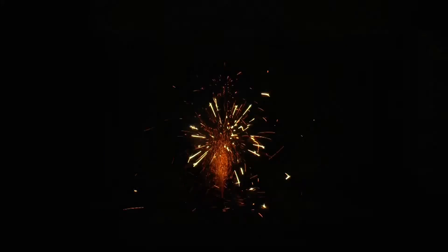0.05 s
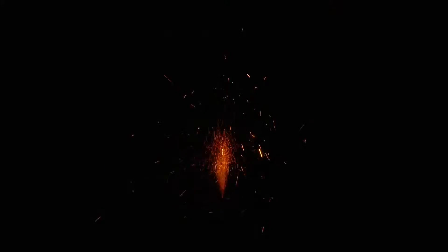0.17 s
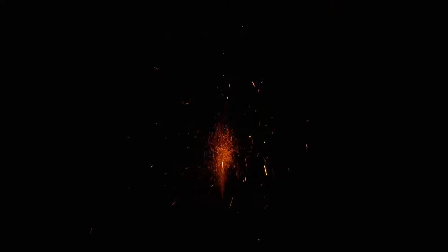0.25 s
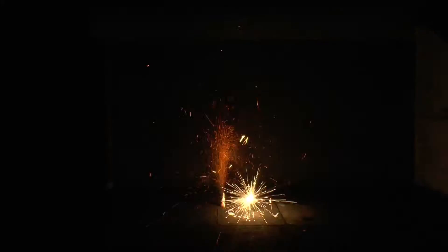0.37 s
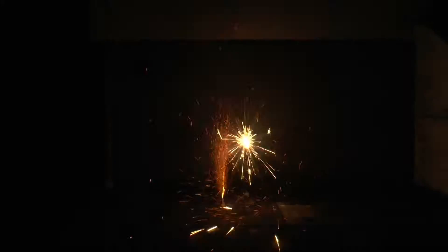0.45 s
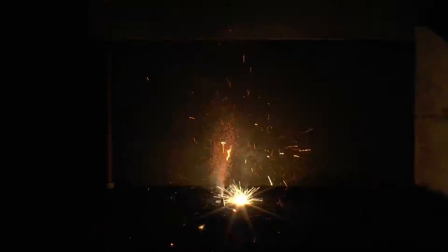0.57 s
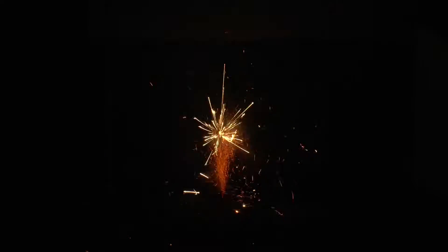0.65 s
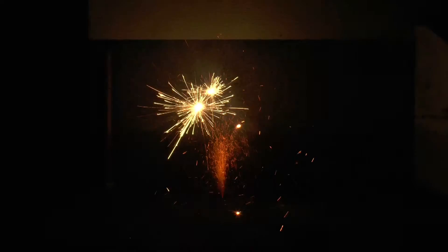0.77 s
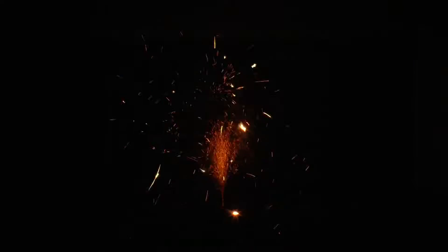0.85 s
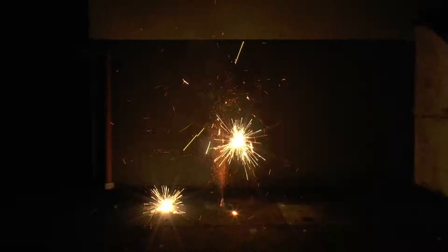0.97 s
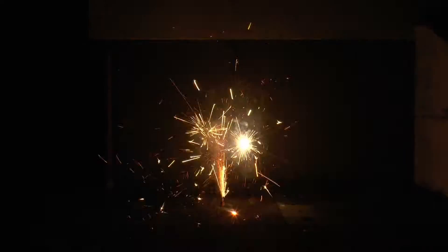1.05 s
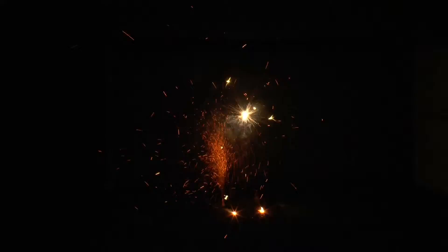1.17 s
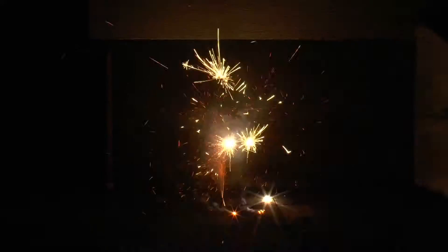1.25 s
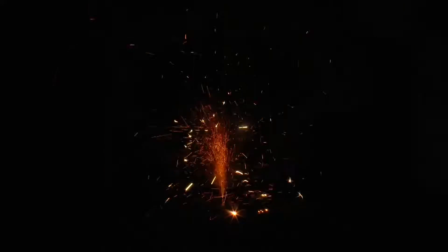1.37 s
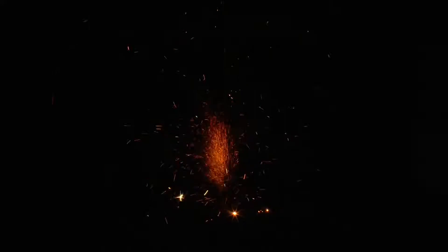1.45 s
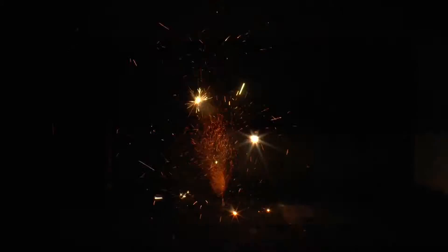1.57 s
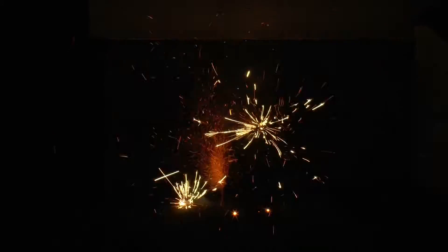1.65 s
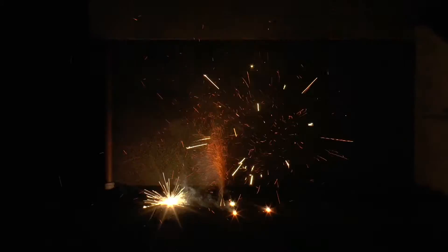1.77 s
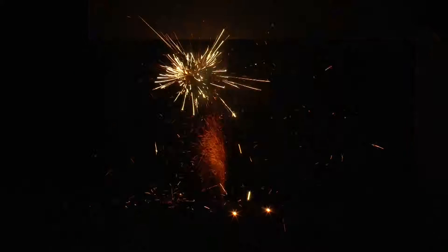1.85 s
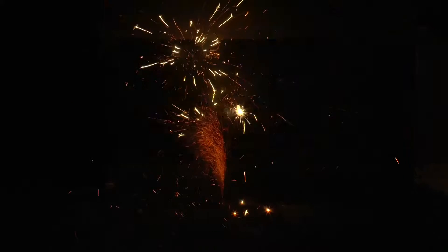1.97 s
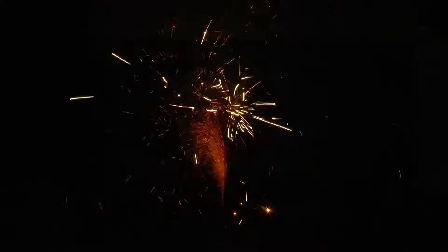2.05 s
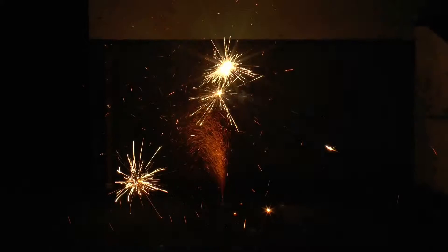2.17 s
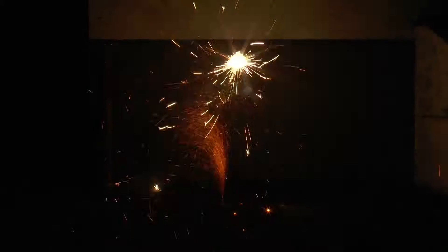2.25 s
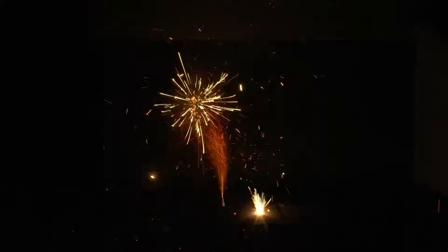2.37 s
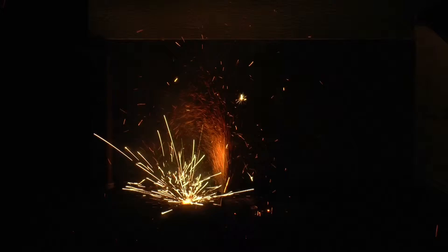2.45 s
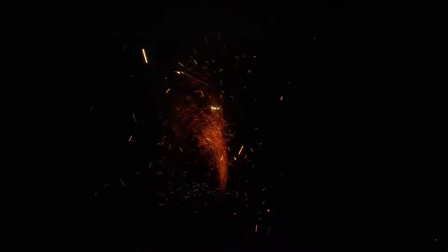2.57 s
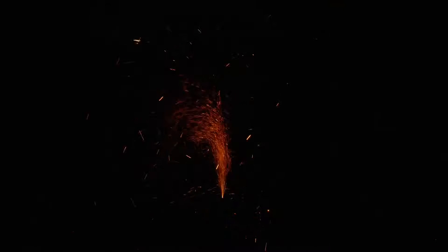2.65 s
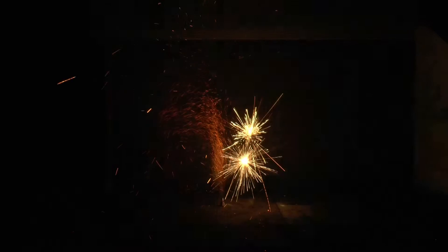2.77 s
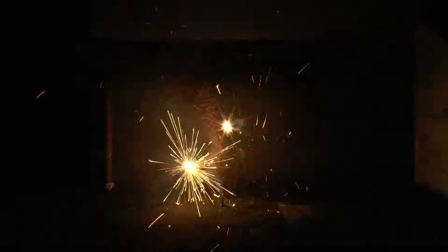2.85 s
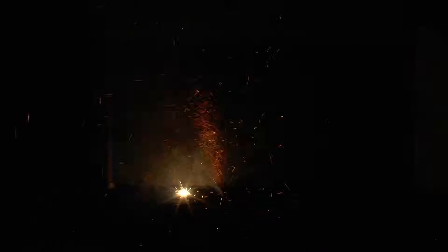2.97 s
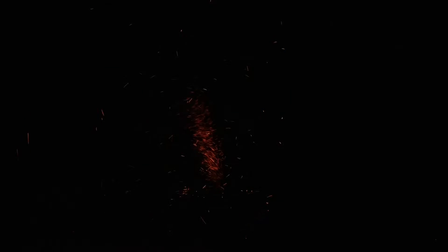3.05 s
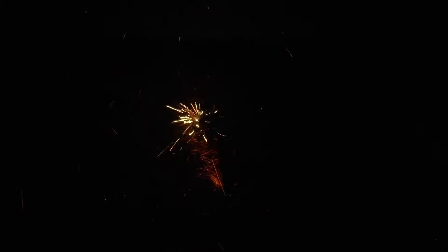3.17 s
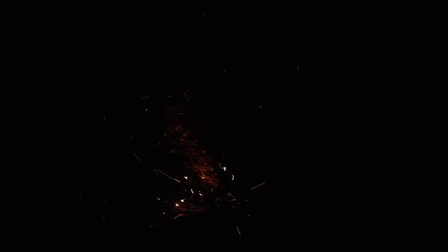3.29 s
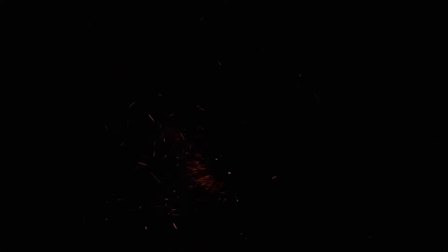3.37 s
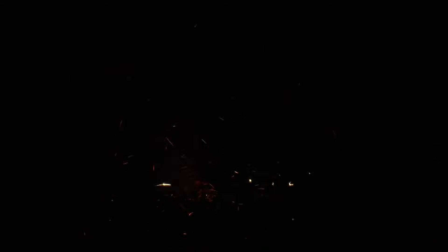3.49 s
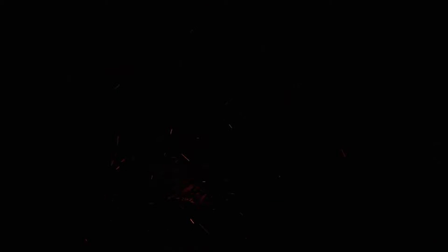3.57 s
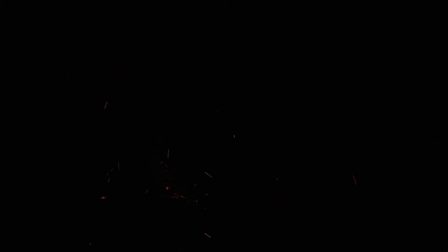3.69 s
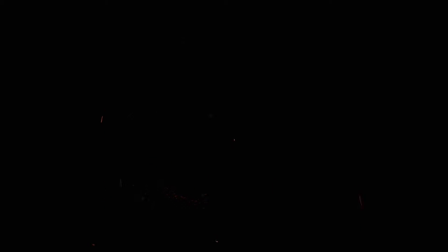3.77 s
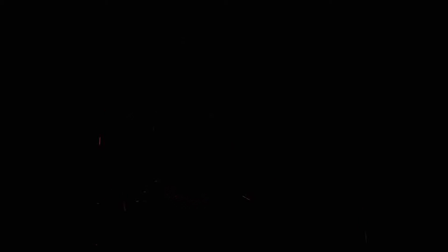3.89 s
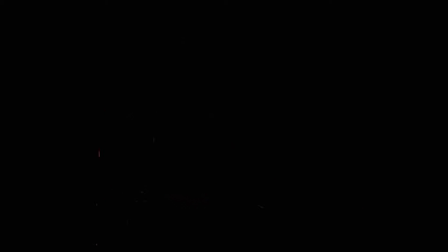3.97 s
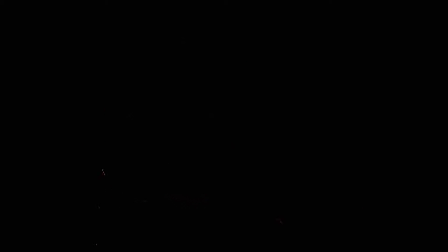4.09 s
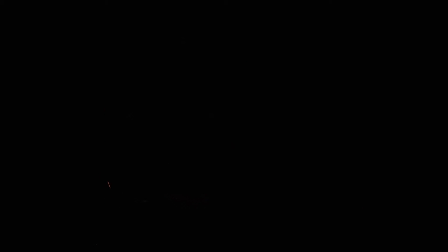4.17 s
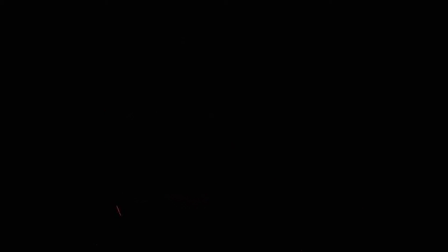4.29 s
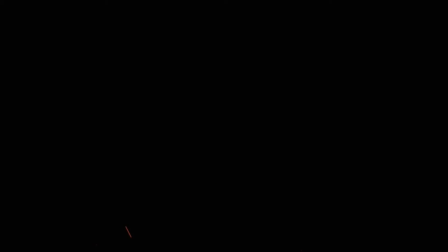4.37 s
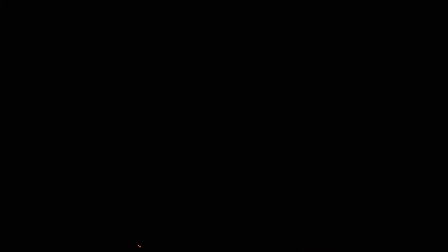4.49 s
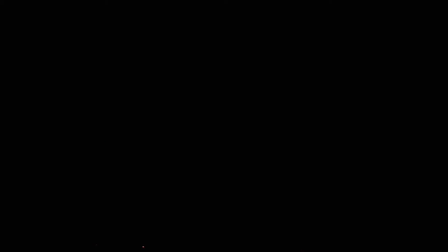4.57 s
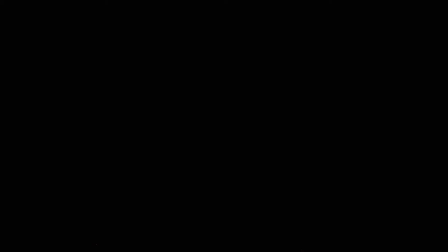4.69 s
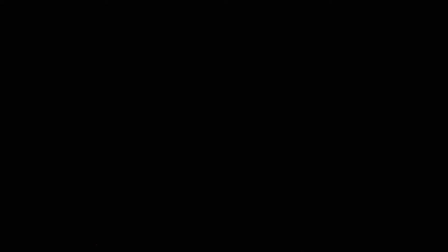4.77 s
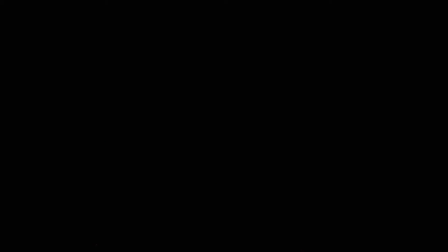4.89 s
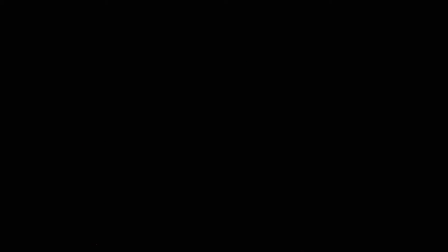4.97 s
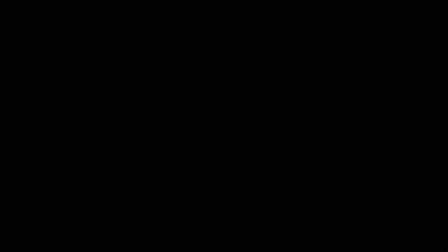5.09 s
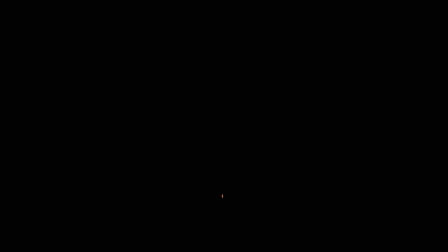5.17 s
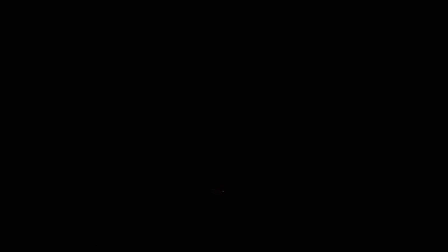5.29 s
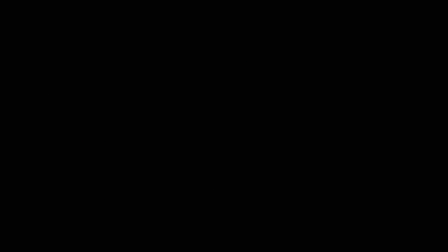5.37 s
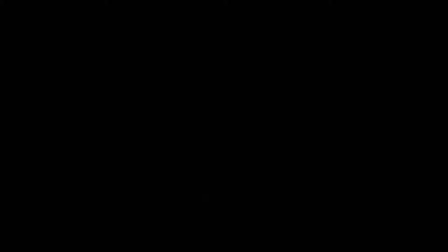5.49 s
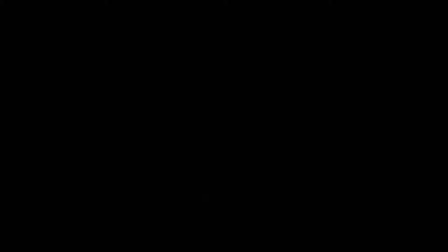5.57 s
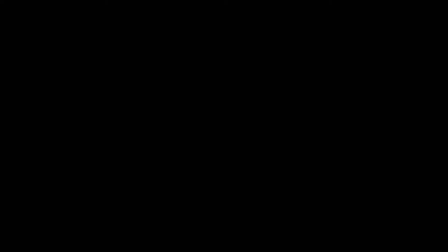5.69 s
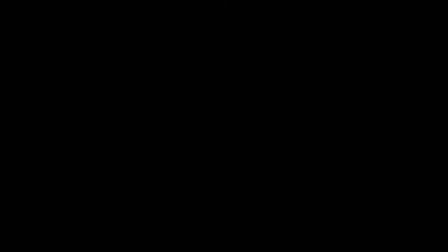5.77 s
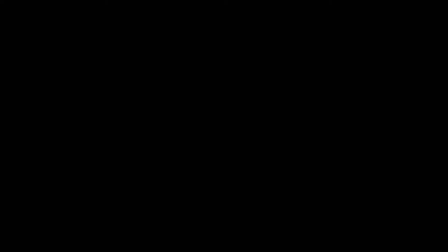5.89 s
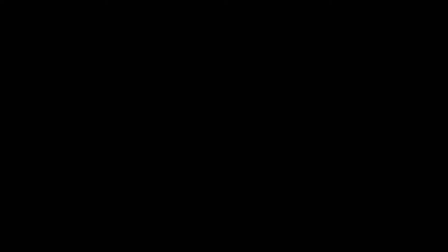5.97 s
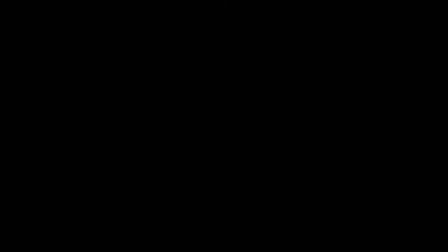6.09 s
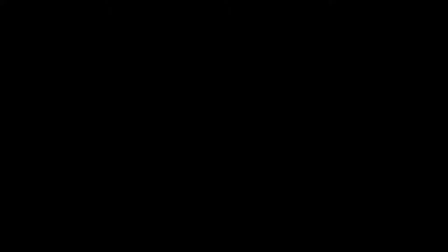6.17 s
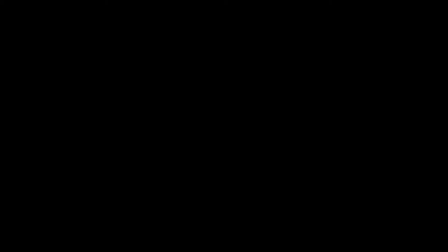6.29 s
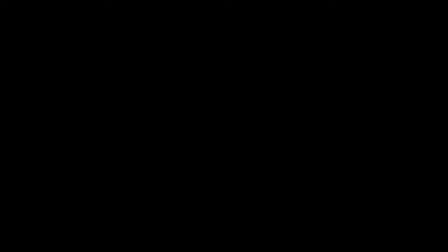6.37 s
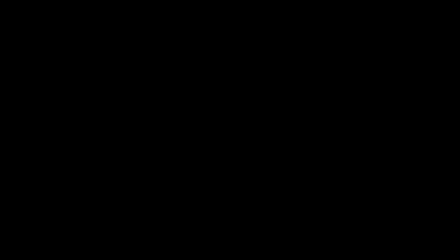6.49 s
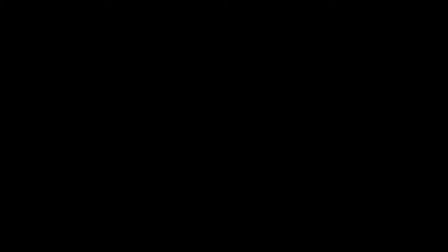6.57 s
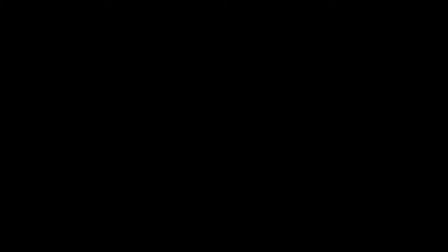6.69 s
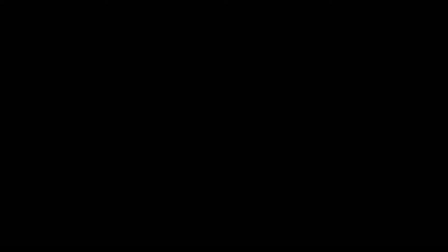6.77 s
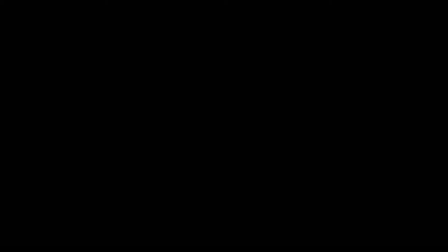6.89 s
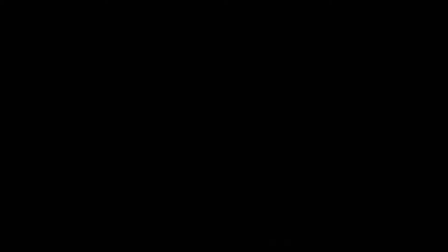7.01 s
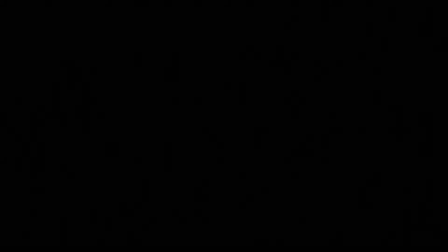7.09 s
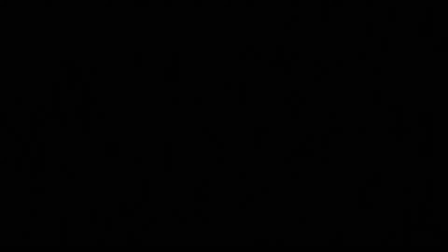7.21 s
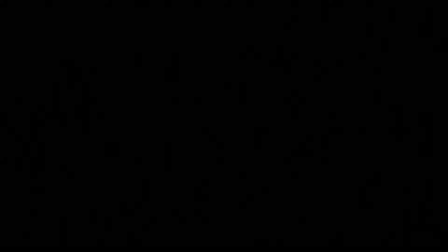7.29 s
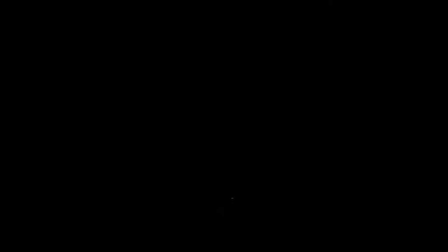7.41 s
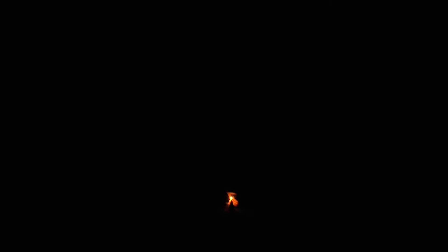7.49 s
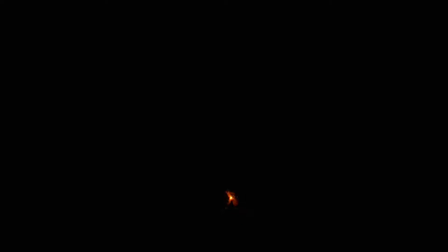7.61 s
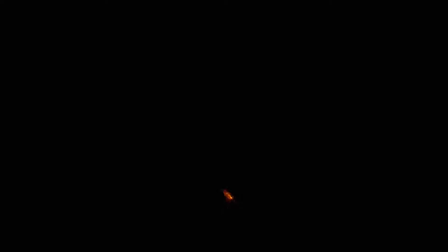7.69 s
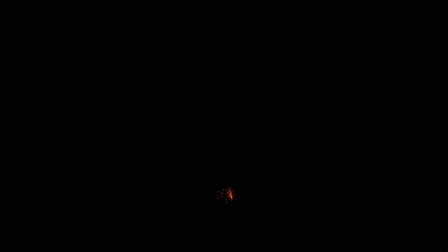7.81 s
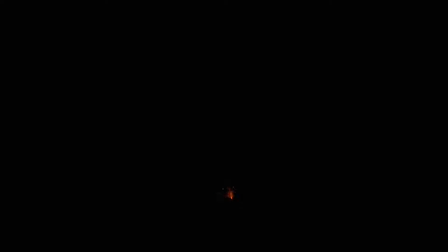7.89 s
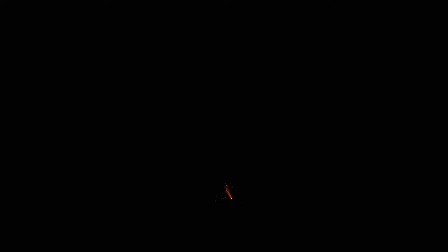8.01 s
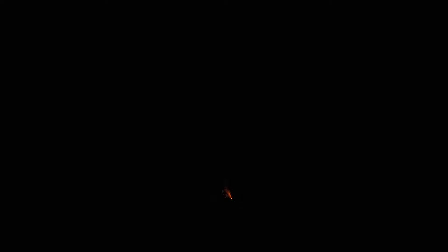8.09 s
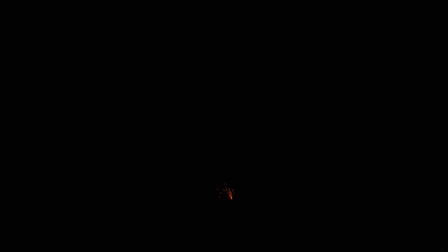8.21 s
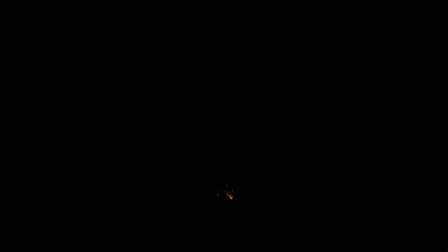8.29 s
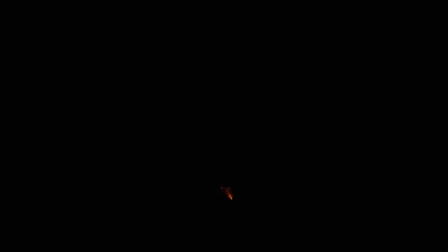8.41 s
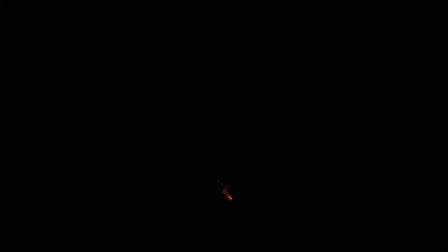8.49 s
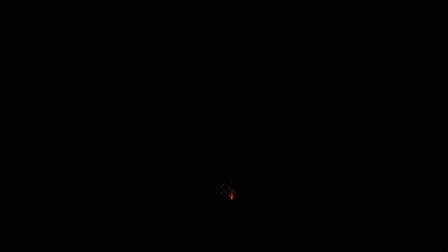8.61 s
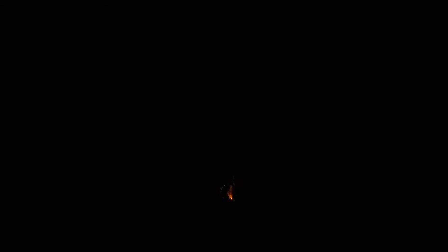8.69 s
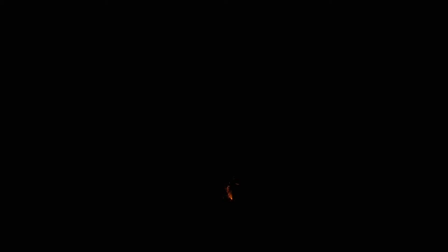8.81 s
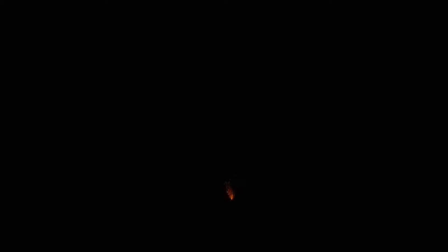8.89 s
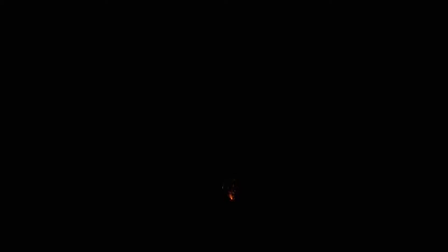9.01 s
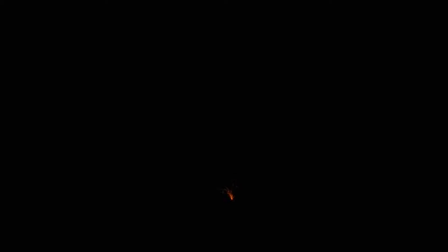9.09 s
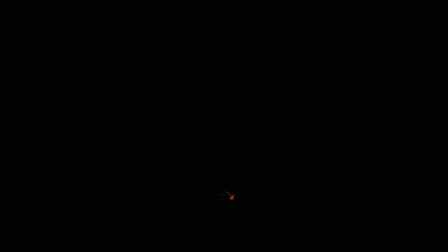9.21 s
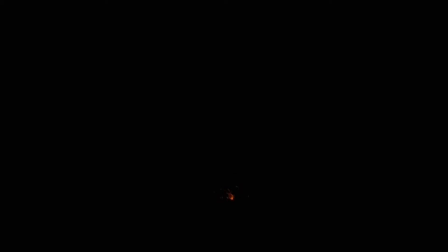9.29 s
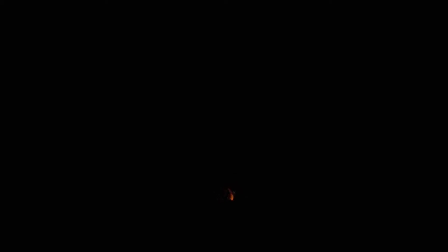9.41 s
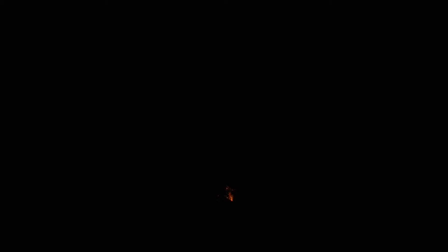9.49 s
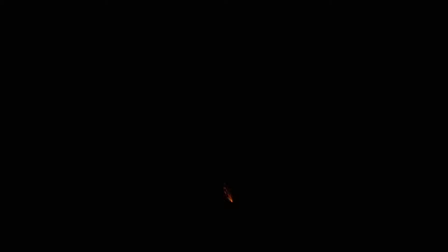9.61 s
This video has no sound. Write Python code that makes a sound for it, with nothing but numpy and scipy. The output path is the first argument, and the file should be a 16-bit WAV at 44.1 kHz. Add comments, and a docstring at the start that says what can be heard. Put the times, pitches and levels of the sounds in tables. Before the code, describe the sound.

Rapid loud firework cracks with low thumps echo in a walled yard, die to faint wind and near silence, then a second fountain hisses and spits.

```python
"""Crackling ground fountain in a walled yard at night

Stars burst as sharp cracks over low thumps, above a jet of filtered noise with sputter and a low roar.
Where each star bursts sets its echoes from the ground and the walls. The fountain burns out among dull
knocks and soft puffs; wind and a smooth background hum, both shaped noise, remain. The whole sound fades
almost to silence and back, then a second fountain catches and hisses, with spurts and ticking embers."""
import sys
import numpy as np
from scipy import signal
from scipy.fft import irfft
from scipy.io import wavfile
from scipy.ndimage import uniform_filter1d

SR = 44100
rng = np.random.default_rng(int(sys.argv[2]) if len(sys.argv) > 2 else 0)


def store_pcm(level_fs):
    """Save levels as 16-bit WAV."""
    pcm = np.round(np.clip(level_fs, -1, 1) * 32767).astype(np.int16)
    wavfile.write(sys.argv[1], SR, np.atleast_2d(pcm).T)


N = 425563


def stars():
    """Each star is a sharp crack over a low thump, thrown back by ground and walls; embers tick more faintly."""
    # Bursting stars. Each row: start in seconds, crack level in dB, thump level in dB relative to the crack
    # (before the lift below), dullness from 0 to 1, metres to the right, metres before the back wall, metres high.
    bursts = [(0.0094, -1.5, -16, 0.13, 0.36, 0.73, 1.23), (0.0278, 1.5, -29.5, 0.13, 0.45, 0.78, 0.08),
              (0.0624, -2, -14, 0.85, 0.24, 0.62, 0.25), (0.3409, 1.5, -21.5, 0.57, 0.49, 1.23, 0.11),
              (0.3536, -8.5, -10, 0.4, -0.053, 0.43, 0.91), (0.4328, 3, -18, 0.0, 0.52, 1.16, 0.065),
              (0.4947, -9, -15, 0.08, 0.21, 0.91, 0.21), (0.5471, -2, -21.5, 0.1, 0.58, 0.59, 0.2),
              (0.6269, -1, -21.5, 0.1, 0.5, 0.75, 0.085), (0.6784, -1, -22, 0.08, 0.3, 0.69, 0.26),
              (0.802, 2, -20, 0.28, -0.028, 0.34, 0.1), (0.8244, -3.5, -22.5, 0, 0.16, 0.84, 0.37),
              (0.9635, 0, -19.5, 0.16, 0.16, 0.71, 0.38), (1.02, 0, -19.5, 0, 0.41, 0.38, 0.37),
              (1.0316, -1.0, -16.5, 0.2, 0.11, 0.98, 0.29), (1.0648, -1, -20, 0.28, 0.58, 0.51, 0.2),
              (1.1038, -6, -18.5, 0.0, 0.4, 0.91, 0.18), (1.2371, 4, -21, 0.03, 0.29, 0.83, 0.34),
              (1.2499, -11.5, -35, 0.46, 0.12, 0.42, 0.55), (1.3261, 1, -19.5, 0.1, 0.79, 0.55, 0.14),
              (1.3603, -4.5, -19.5, 0.06, 0.19, 0.77, 0.31), (1.5216, -8, -15, 0.1, 0.24, 1.01, 0.11),
              (1.5309, -0.5, -21, 0.34, 0.23, 0.57, 0.3), (1.5537, -5, -24.5, 0.0, 0.51, 0.33, 0.72),
              (1.6138, -11.5, -43.0, 0, -0.088, 0.19, 0.46), (1.6411, 3.5, -20, 0.07, 0.48, 1.3, 0.24),
              (1.7687, 1.5, -20.5, 0.13, 0.4, 0.98, 0.3), (1.828, -5, -14, 0.67, 0.31, 0.65, 0.56),
              (1.8666, 1.5, -22.0, 0.13, -0.03, 0.6, 0.48), (1.9597, -5, -35, 0.17, 0.51, 1.1, 1.07),
              (1.9767, 0.5, -18.5, 0.25, -0.29, 0.68, 0.58), (2.0328, -13.5, -13.5, 0.5, 0.48, 0.24, 1.54),
              (2.0443, 3, -22.5, 0.0, 0.21, 0.32, 0.56), (2.1351, -0.5, -21.5, 0.15, -0.025, 0.64, 0.22),
              (2.1981, -6.5, -17, 0.7, 0.43, 0.44, 0.23), (2.2125, 1, -19.5, 0.0, 0.18, 1.18, 0.46),
              (2.2511, -0.5, -20, 0.0, 0.27, 0.76, 0.62), (2.2834, -12.5, -19, 0, 0.4, 0.48, 0.25),
              (2.3363, -8.5, -14.5, 0.2, 0.49, 0.76, 0.22), (2.3907, -3.5, -12, 0.86, 0.01, 0.76, 0.45),
              (2.419, -9, -17, 0.19, 0.44, 0.93, 0.14), (2.4706, 4, -18, 0.18, -0.68, 0.21, 0.43),
              (2.489, -12.5, -65.5, 0.0, -0.38, 0.45, 0.89), (2.5395, -7, -20, 0.32, 0.18, 0.53, 0.54),
              (2.7197, -2.5, -20, 0, -0.29, 0.72, 0.66), (2.797, -5, -24.5, 0.18, 0.51, 1.25, 0.25),
              (2.8351, 4.5, -22.5, 0.04, 0.51, 0.91, 0.19), (2.8517, -13, -47, 0, -0.4, 0.35, 0.1),
              (2.89, 1.5, -26.5, 0.17, 0.01, 0.84, 0.15), (2.9183, -7.5, -18, 0.12, 0.17, 0.97, 0.29),
              (3.0197, -7, -25, 0.04, -0.084, 0.36, 0.51), (3.1852, -1.0, -27, 0.0, 0.028, 0.87, 0.34),
              (3.2801, 0, -22, 0.32, 0.41, 0.94, 0.15), (3.4659, 2, -19, 0.42, 0.66, 0.54, 0.099),
              (3.682, -12, -26, 0.27, -0.12, 0.25, 0.14)]
    # Left minus right of each echo, in dB, in the order of the mirror images.
    echo_pan = [0.3, 1, -4, -5.5, -4.5, 3, 8.5, 6.5]
    # Typical level of each echo in dB relative to its crack, in the same order.
    echo_loss = [-2, -4.5, -7.5, -5.5, -7, -4.5, -16.5, -8]
    # Distant house fronts. Each row: delay in seconds, level in dB relative to the crack.
    house_fronts = [(0.12, -23), (.1225, -25.5), (0.146, -31)]
    # Small ticks of embers. Each row: start in seconds, level in dB, dullness from 0 to 1.
    embers = [(7.922, -16, 0.1), (7.928, -17.5, 0.5), (7.943, -23, 0.9), (8.7, -20, .7), (8.703, -16.5, 1),
              (8.71, -17, 1), (8.716, -21, 0.2), (9.145, -30, 0.6), (9.401, -29, .9), (9.554, -16, 1),
              (9.562, -27, .9)]
    # Crack spectrum. Each row: frequency in Hz, relative level in dB per Hz.
    crack_tone = [(350, -45.5), (700, -15), (1100, -13), (1900, -1.5), (3000, -3.5), (4500, -2.5),
                  (6500, -4), (10000, -4), (13000, -12), (16000, -28.5)]
    # Thump spectrum. Each row: frequency in Hz, relative level in dB per Hz.
    thump_tone = [(25, -12.5), (60, -3), (110, 0), (190, 0), (300, -0.5), (420, 0.5), (700, -4.5),
                  (1200, -15.5), (3000, -72.5)]
    echo_scatter_db = 3.2  # rough surfaces throw some echoes wide
    thump_lift_db, thump_echo_lift_db = 3.5, 2.5

    s, db, thump_db, dull, *place = np.transpose(bursts)[:, :, None]
    late_ms, pan_db = 1000 * echoes(*place), np.array(echo_pan)
    loss_db = echo_loss + echo_scatter_db * rng.standard_normal(late_ms.shape)
    jitter_s = rng.uniform(-1, 1, late_ms.shape) / 20000  # small random timing jitter on each echo
    echo_s, echo_db = s + late_ms / 1000 + jitter_s, db + loss_db
    duller = dull + 0.0008 * late_ms  # longer paths lose treble
    near = cracks(np.c_[s, echo_s], np.c_[db, echo_db], np.r_[0, pan_db], np.c_[dull, duller])

    far_s, far_db = np.transpose(house_fronts)
    far_s, far_db = np.ravel(s + far_s), np.ravel(db + far_db)
    far_dull = np.full(far_s.shape, 0.6)
    tick_s, tick_db, tick_dull = np.transpose(embers)
    small = cracks(np.r_[far_s, tick_s], np.r_[far_db, tick_db], 0, np.r_[far_dull, tick_dull])

    # three random tails take turns, changing 11 times a second, so no one colour persists
    turn = np.arange(N) * 11 // SR % 3
    tails = sum(yard(near.mean(0) * (turn == k)) for k in range(3))

    hz = np.fft.rfftfreq(4096, 1 / SR)
    # the crack is a narrow negative spike between two small positive lobes
    crack = -np.roll(irfft(amp(read(crack_tone, hz))), 20)[:160]
    crack = crack * signal.windows.tukey(160, 0.25)
    thump = causal(read(thump_tone, hz), size=3000)  # a push, then a longer pull

    low = arrivals(s, db + thump_db + thump_lift_db, 0)
    # later thump echoes are weaker still
    low_echo_db = echo_db + thump_db + thump_echo_lift_db - 0.69 * late_ms
    low += arrivals(echo_s, low_echo_db, 0.91 * pan_db)
    low += amp(-5.0) * yard(low[0])
    return shaped(near + small + amp(-9) * tails, crack) + shaped(low, thump)


def cracks(s, db, pan_db, dull):
    """Impulses, each a blend of a sharp and a low-passed one, trailed by a short spray from debris and rough walls."""
    dull, t = np.clip(dull + 0 * db, 0.01, 0.99), np.arange(1000) / SR
    sharp = arrivals(s, db + 20 * np.log10(1 - dull), pan_db)
    soft = arrivals(s, db + 20 * np.log10(3.95 * dull), pan_db)
    grit = rng.standard_normal(N) + 0.3 * rng.standard_normal((2, N))  # mostly common to both sides
    spray = amp(-60 * t / 0.02)  # dies 60 dB in 20 ms
    sharp = sharp + amp(-28) * shaped(sharp, spray) * grit
    soft = soft + amp(-28) * shaped(soft, spray) * grit
    return sharp + signal.filtfilt(*signal.butter(1, 4000, fs=SR), soft)


def echoes(right, before, high):
    """Delay in s of every mirror image after the direct sound, from the difference in path length."""
    # Mirror images of a star, seen from the foot of the microphone, in the order: ground; back wall; back wall
    # and ground; right wall; right and back walls; left wall; left and back walls; something high up behind
    # on the left. Each row: sign flip right, ahead, up, then shift in metres right, ahead, up.
    mirrors = [(1, 1, -1, 0, 0, 0), (1, -1, 1, 0, 4.52, 0), (1, -1, -1, 0, 4.52, 0), (-1, 1, 1, 3.86, 0, 0),
               (-1, -1, 1, 4.04, 4.52, 0), (-1, 1, 1, -6.68, 0, 0), (-1, -1, 1, -6.94, 4.52, 0),
               (1, 1, -1, -8.24, -3.32, 9.72)]
    mic_height_m, back_wall_m, sound_m_per_s = 1.44, 2.26, 343
    place = np.stack([right, back_wall_m - before, high], axis=-1)
    flip, shift = np.split(np.array(mirrors), 2, axis=1)
    mic = np.array([0, 0, mic_height_m])
    direct_m = np.linalg.norm(place - mic, axis=-1)
    echo_m = np.linalg.norm(place * flip + shift - mic, axis=-1)
    return (echo_m - direct_m) / sound_m_per_s


def yard(x):
    """Reverberation from sparse taps of random sign, each band dying at its own speed."""
    # How long the yard rings. Each row: frequency in Hz, time to die 60 dB in seconds.
    ring_times = [(100, 0.064), (250, 0.61), (600, 0.28), (1400, 0.41), (3700, 0.83), (7000, 0.44),
                  (12000, 0.23)]
    size = SR * 2 // 3
    taps = np.zeros((2, size))
    at = np.arange(100, size - 20, 20) + rng.integers(0, 20, (2, (size - 101) // 20))
    np.put_along_axis(taps, at, rng.choice([-1., 1.], at.shape), 1)
    taps[1] = 0.75 * taps[0] + 0.67 * taps[1]  # the two sides are partly alike
    hz, t, z = signal.stft(taps, SR, nperseg=256)
    slope = amp(-60 * t / read(ring_times, hz)[:, None])
    slope = slope + 5 * amp(-60 * t / 0.042)  # near walls die first
    tail = signal.istft(z * slope, SR, nperseg=256)[1]
    return signal.oaconvolve(x[None], tail / np.linalg.norm(tail[0]), axes=1)[:, :N]


def jet():
    """Burning powder: a patchy hiss with fine sputter over a low roar that follows its level."""
    # Burn level of both fountains. Each row: time in seconds, level in dB before surges and a 1 dB lift.
    burn = [(0, -47), (.5, -50), (1.3, -47.5), (1.7, -45.5), (2.4, -52), (2.6, -41.5), (2.95, -84),
            (3.55, -67), (3.7, -51), (3.9, -100), (6.7, -82), (7.0, -61.5), (7.2, -56), (7.47, -62.5),
            (7.49, -48.5), (7.525, -38), (7.59, -34), (7.69, -42), (7.95, -42.5), (8.1, -42.5), (8.21, -43),
            (8.34, -48.5), (8.43, -43.5), (8.72, -43.5), (8.84, -45.5), (9.13, -42.5), (9.38, -46),
            (9.65, -43.5)]
    # Hiss spectrum. Each row: frequency in Hz, relative level in dB per Hz.
    hiss_tone = [(59, -28.5), (100, 0.5), (224, -9.5), (583, -8.5), (634, -9.5), (721, -2.5), (891, -11),
                 (1420, -1), (1580, -9.5), (1910, 2.5), (3400, -2), (6420, -1), (11200, -5), (15000, -21),
                 (16000, -35)]
    # Roar spectrum. Each row: frequency in Hz, relative level in dB per Hz.
    roar_tone = [(120, -25), (190, 0.5), (300, -8.5), (573, -5.5), (755, 1.5), (882, -9), (1410, -4),
                 (2000, 0), (2800, -12.5), (5000, -23), (15000, -48)]
    roar_db, roar_slope = -48.5, 1.4  # roar at a burn level of -42.5 dB; dB per dB of burn
    sputters_per_s = 300
    hiss, level_db = noise(hiss_tone, 1.8, 0.84, size=512), curve(burn, 1)

    sputter = amp(3.4 * np.minimum(rng.exponential(1, N), 4))
    sputter = sputter * (rng.random(N) < sputters_per_s / SR) * rng.choice([-1, 1], N)
    sputter = evened(signal.lfilter(*signal.butter(2, [1800, 9000], "band", fs=SR), sputter))

    roar = amp(roar_db + roar_slope * (level_db + 42.5)) * noise(roar_tone, 0.8, 1.5, size=1024)
    surge = uniform_filter1d(uniform_filter1d(rng.standard_normal(N), size=1500), size=1500)
    surge_db = 0.7 * evened(surge)  # the burn is uneven
    return amp(level_db + surge_db + 1.0) * (hiss + amp(-16.5) * sputter) + roar


def knocks():
    """Dull knocks: a click and a short wooden ring of dying sines, with echoes and the yard after them."""
    # Knocks around the burn-out. Each row: start in seconds, peak level in dB of the direct pulse
    # before its echo gain.
    blows = [(3.1183, -27), (5.243, -15)]
    # Ring of a knock. Each row: frequency in Hz, relative level in dB, time to die 60 dB in seconds.
    modes = [(244, -10, 0.0027), (590, -13.5, 0.0041), (983, -23, 0.0046), (1460, -7.5, 0.034),
             (1820, -5.5, 0.018), (2015, -3, 0.016)]
    # Arrivals of each knock. Each row: delay in seconds, gain in dB, left minus right in dB.
    returns = [(0, 6.5, -3.5), (.004, 2, -1.5), (.0056, 3, 0.5), (.008, -5, -5), (0.0147, -3, 12.5),
               (0.017, -4.5, -0.5), (.027, -6.5, 5.5)]
    click_db, click_hz, click_s = -5.5, 4800, 0.00008  # click_s is the time to its peak
    t = np.arange(2000) / SR
    body = sum(amp(db - 60 * t / t60) * np.sin(2 * np.pi * hz * t) for hz, db, t60 in modes)
    click = t / click_s * np.exp(1 - t / click_s)
    body += amp(click_db) * click * np.sin(2 * np.pi * click_hz * t)
    band = signal.butter(N=2, Wn=[2500, 10000], btype="band", fs=SR)
    splinters = signal.lfilter(*band, rng.standard_normal(len(t)))
    body += amp(-17 - 60 * t / 0.03) * splinters

    s, db = np.transpose(blows)[:, :, None]
    late, gain_db, pan_db = np.transpose(returns)
    direct = shaped(arrivals(s + late, db + gain_db, pan_db), body)
    return direct + amp(-11.5) * yard(direct[0])


def puffs():
    """Brief bell-shaped swells of broad band-passed noise, softened at the top."""
    # Soft puffs from the spent cone, then brief spurts of the second jet. Each row: time of the peak in seconds,
    # level in dB before the treble cut, half length in seconds (down to 1/e), centre in Hz.
    swells = [(3.919, -50.5, 0.066, 2530), (5.665, -55, 0.064, 4800), (8.062, -36, 0.033, 6940),
              (8.42, -41, 0.019, 7000), (8.64, -41, .015, 7500), (8.944, -41.5, 0.027, 8000),
              (9.14, -48, .03, 7000), (9.506, -41, 0.064, 7800)]
    t, out = np.arange(N) / SR, np.zeros(N)
    for s, db, half, hz in swells:
        edges = signal.butter(N=3, Wn=[hz / 1.8, hz * 1.8], btype="band", fs=SR, output="sos")
        breath = evened(signal.sosfilt(edges, rng.standard_normal(N)))
        out += amp(db) * breath * np.exp(-((t - s) / half) ** 2)
    return signal.lfilter(*signal.butter(N=2, Wn=11000, fs=SR), out)


def night():
    """Smooth background hum, with the blurred wash of the yard during the first burn, and lumpy, gusty low wind."""
    # Background levels. Each row: time in seconds, hum and wash in dB before a 3.5 dB lift, steady wind
    # on the microphone in dB.
    air = [(0, -53.5, -53), (.4, -48.5, -51), (.9, -56.5, -53), (1.3, -50.5, -54.5), (2.4, -51, -54),
           (3.42, -61.5, -60), (3.85, -62, -68), (4.25, -58.5, -52), (4.45, -54.5, -54.5),
           (5.1, -53.5, -52.5), (5.6, -53, -52), (6.2, -51, -56), (7.0, -55.5, -51), (7.4, -55.5, -55.5),
           (9.65, -52, -54)]
    # Gusts that bump the microphone. Each row: time of the peak in seconds, peak level in dB,
    # half length in seconds (down to 1/e).
    bumps = [(3.925, -50.5, 0.085), (4.304, -49, .03), (4.357, -45, 0.037), (4.673, -62, .04),
             (5.032, -47, 0.017), (5.257, -54, 0.021), (5.494, -45, 0.039), (5.828, -44.5, 0.039),
             (5.95, -52.5, 0.017), (6.12, -54, .03), (6.19, -50, .03), (6.297, -47.5, .025)]
    # Hum spectrum. Each row: frequency in Hz, relative level in dB per Hz.
    hum_tone = [(150, -32.5), (250, -0.5), (427, -4), (482, -7.5), (573, -2.5), (646, -18), (755, 1.5),
                (882, -13.5), (1290, -9), (1410, -3.5), (1730, -4), (4870, -21.5), (12200, -30),
                (14200, -32), (15500, -55.5)]
    # Wind spectrum. Each row: frequency in Hz, relative level in dB per Hz.
    wind_tone = [(12, -30.5), (20, -12), (53, 7.5), (112, 5.5), (211, 3), (312, -24), (500, -17),
                 (650, -47.5), (1100, -120)]
    t = np.arange(N) / SR
    hum = amp(curve(air, 1) + 3.5) * noise(hum_tone, 0.5, 0.81, size=1024)
    gusts = sum(amp(db) * np.exp(-((t - s) / half) ** 2) for s, db, half in bumps)
    wind = amp(curve(air, 2)) + gusts
    return hum + wind * noise(wind_tone, 1.4, 1.7, size=2048)


def noise(spectrum, patchy_db, flicker_db, size):
    """Two channels of random short-time spectra with drifting patches and wide-band flicker."""
    # Left-right likeness. Each row: frequency in Hz, correlation from 0 to 1.
    likeness = [(60, 0.69), (300, 0.87), (1400, 0.95), (3000, 0.96), (7000, 0.96), (15000, 1)]
    frames, hz = 4 * N // size + 5, np.fft.rfftfreq(size, 1 / SR)
    a, b, c, d, patches = rng.standard_normal((frames, len(hz), 5)).T
    patches = uniform_filter1d(patches, size=size // 40, axis=0)  # across frequency
    patches = evened(uniform_filter1d(patches, size=8192 // size, axis=1))  # across time
    flicker = evened(uniform_filter1d(rng.standard_normal(frames), size=3))
    same, left = np.clip(read(likeness, hz), -1, 1)[:, None], a + 1j * b
    right = same * left + np.sqrt(1 - same ** 2) * (c + 1j * d)
    z = np.array([left, right])
    z *= amp(read(spectrum, hz)[:, None] + patchy_db * patches + flicker_db * flicker)
    return evened(signal.istft(z, nperseg=size, noverlap=size * 3 // 4)[1][:, :N])


def arrivals(s, db, pan_db):
    """A stereo train of impulses; pan is left minus right."""
    train = np.zeros((2, N))
    at = np.clip(np.round(np.ravel(s) * SR).astype(int), 0, N - 1)
    for side, sign in enumerate((0.5, -0.5)):
        np.add.at(train[side], at, np.ravel(amp(db + sign * pan_db)))
    return train


def shaped(train, pulse):
    """Every impulse replaced by a pulse scaled to a peak of 1."""
    return signal.oaconvolve(train, pulse[None] / abs(pulse).max())[:, :N]


def causal(db, size=4096):
    """Impulse response with the given dB gain on rfft bins and the least delay."""
    full = np.log(amp(np.maximum(np.concatenate([db, db[-2:0:-1]]), -100)))
    return np.fft.ifft(np.exp(full - 1j * signal.hilbert(full).imag)).real[:size]


def amp(db):
    """Amplitude of a level in dB."""
    return 10 ** (np.asarray(db) / 20)


def evened(x):
    """Scaled to an overall RMS of 1."""
    return x / np.sqrt(np.mean(x ** 2) + 1e-20)


def read(points, hz):
    """Values of a frequency table, interpolated along log frequency."""
    f, value = np.transpose(points)
    return np.interp(np.log(hz + 1), np.log(f + 1), value)


def curve(rows, column):
    """One column of a time table, drawn as straight lines over every sample."""
    table = np.array(rows)
    return np.interp(np.arange(N) / SR, table[:, 0], table[:, column])


def scene():
    """All layers together."""
    return stars() + jet() + knocks() + puffs() + night()


def record(dry):
    """Notches from the ground under the microphone, soft overload, a fade through near silence, band limit."""
    # Ground-bounce notches. Each row: centre in Hz, width in Hz, depth in dB.
    notch_rows = [(497.4, 75, -4.5), (894, 98, -2.5), (1294, 78, -5.5), (1567, 80, -10)]
    silence_s, fade_out_s, fade_in_s = 6.582, 1.58, 0.87
    edge_hz = 16600
    hz = np.fft.rfftfreq(4096, 1 / SR)
    notches = causal(sum(db / (1 + (2 * (hz - f) / width) ** 2) for f, width, db in notch_rows))
    heard = signal.oaconvolve(dry, notches[None])[:, :N]
    heard = 0.85 * np.tanh(heard / 0.85)
    t = np.arange(N) / SR - silence_s
    fade = np.clip(np.maximum(-t / fade_out_s, t / fade_in_s), 0.002, 1)
    lowpass = signal.firwin(511, edge_hz, window=("kaiser", 9), fs=SR)
    return signal.oaconvolve(heard * fade, lowpass[None], "same")


dry = scene()
out = record(dry)
store_pcm(out)
```